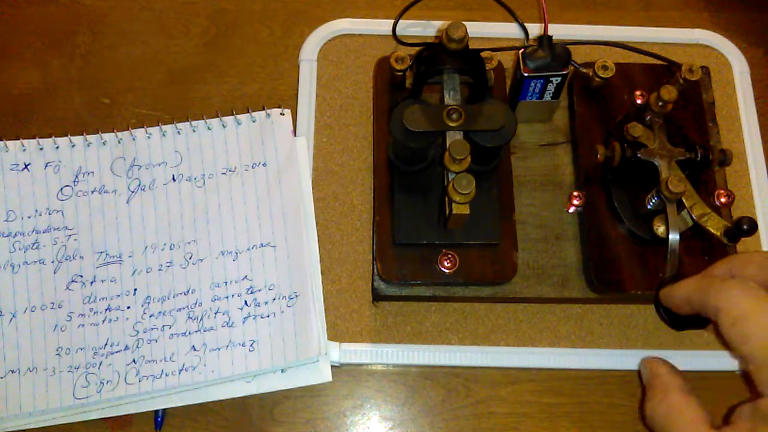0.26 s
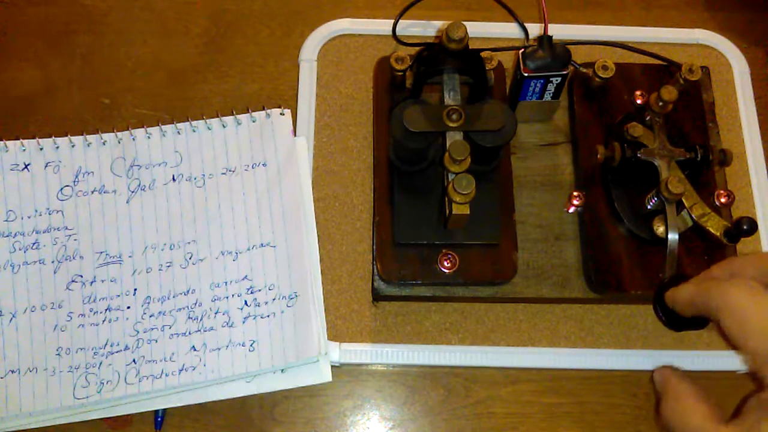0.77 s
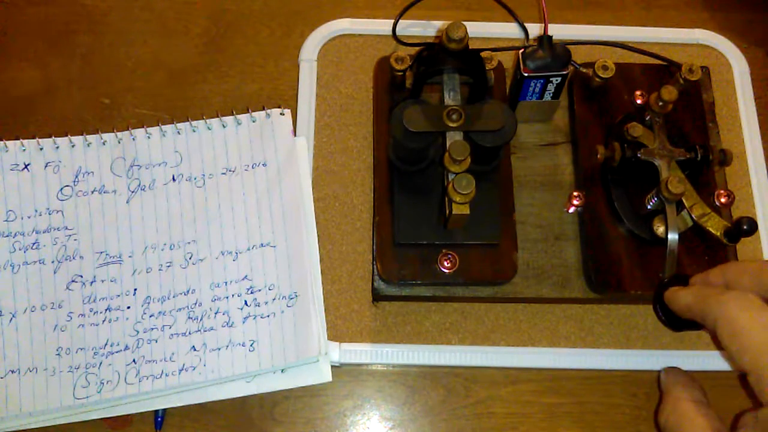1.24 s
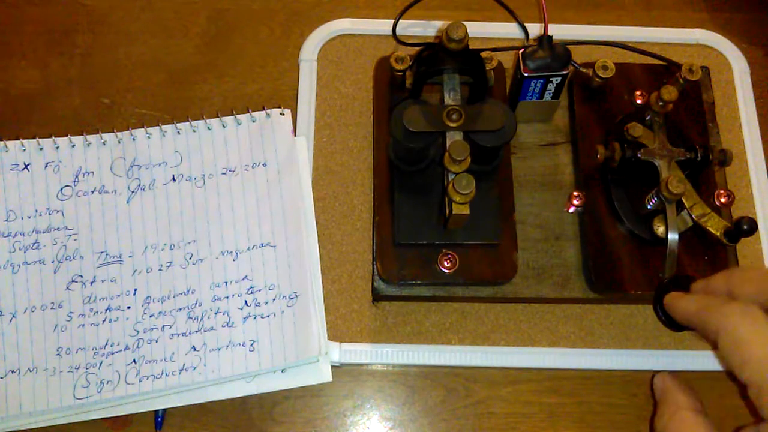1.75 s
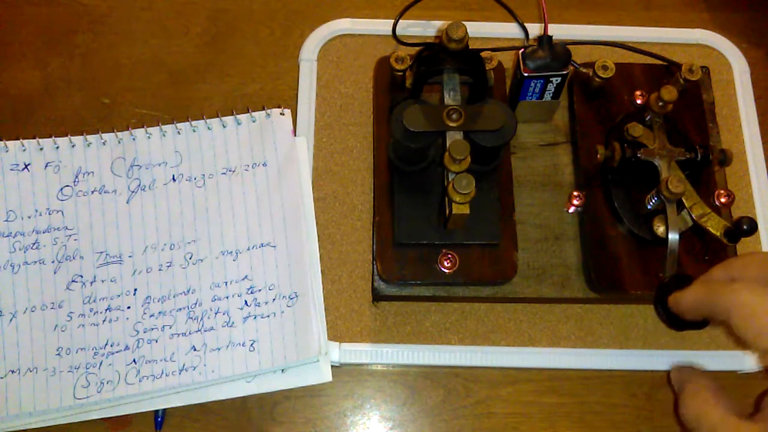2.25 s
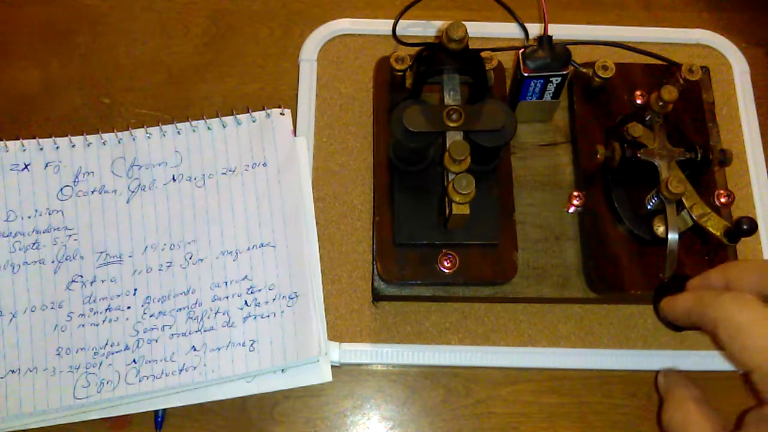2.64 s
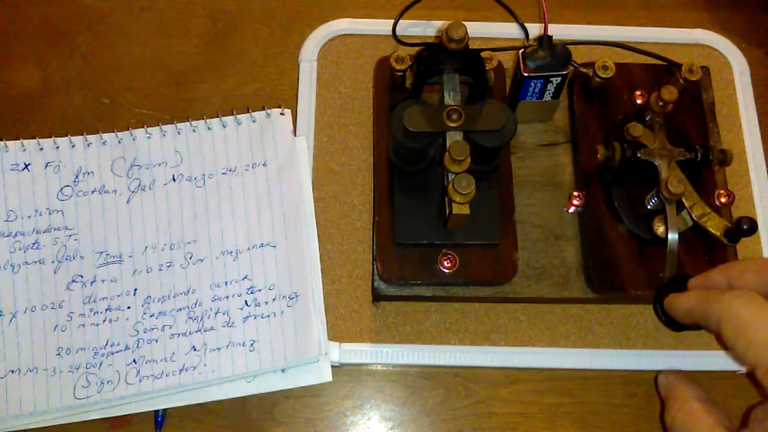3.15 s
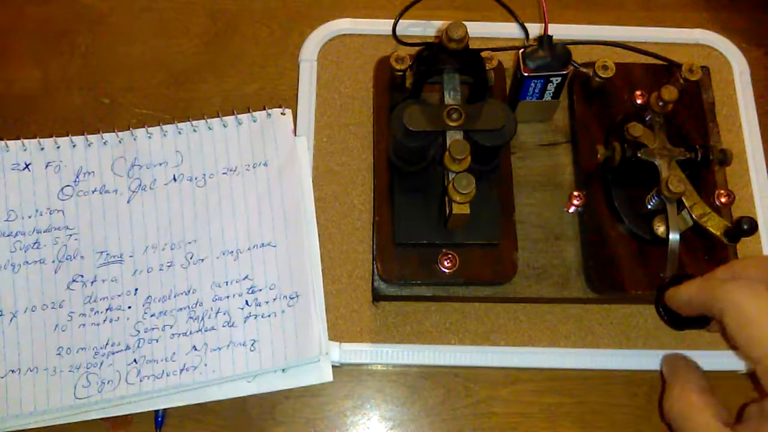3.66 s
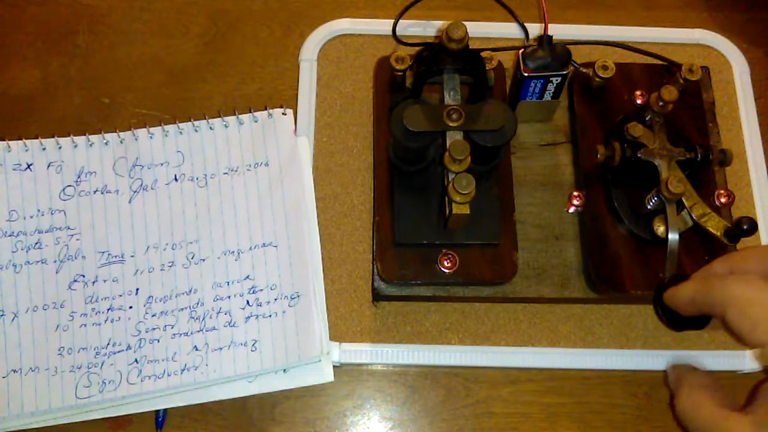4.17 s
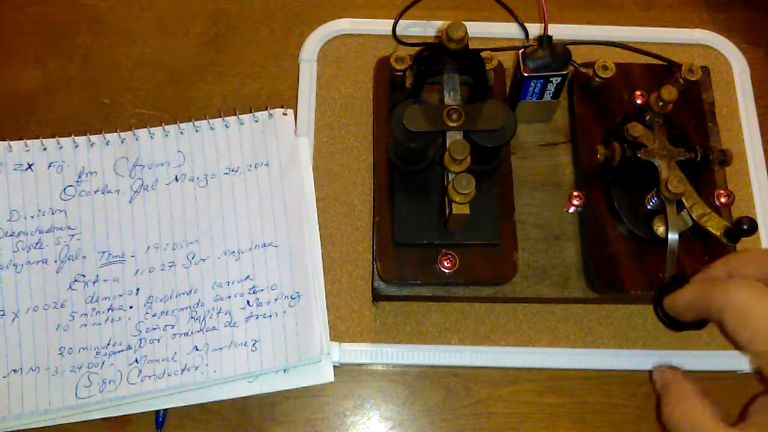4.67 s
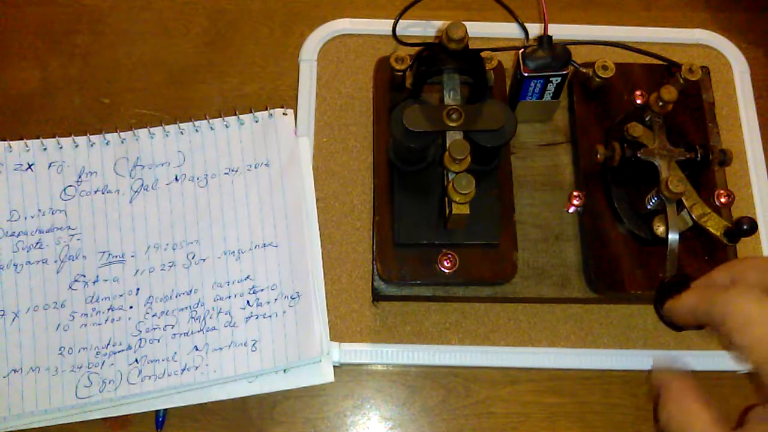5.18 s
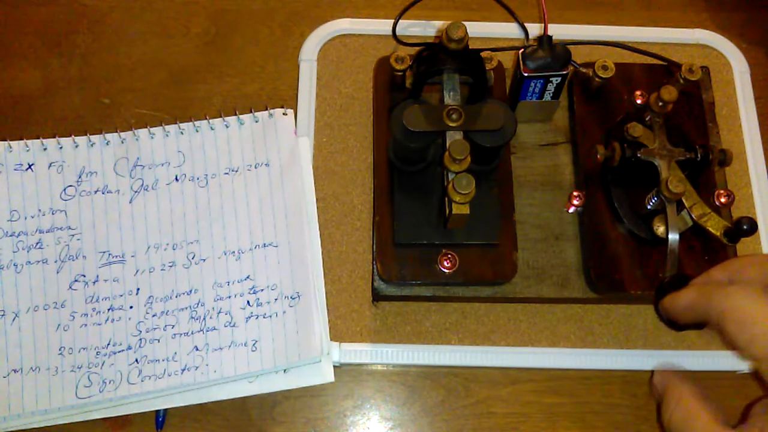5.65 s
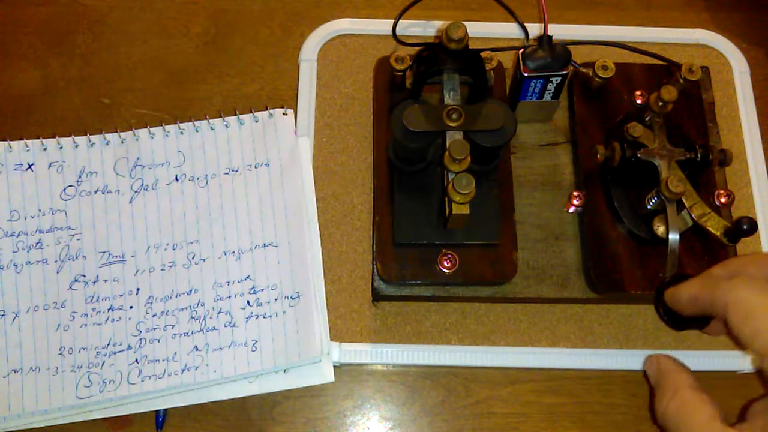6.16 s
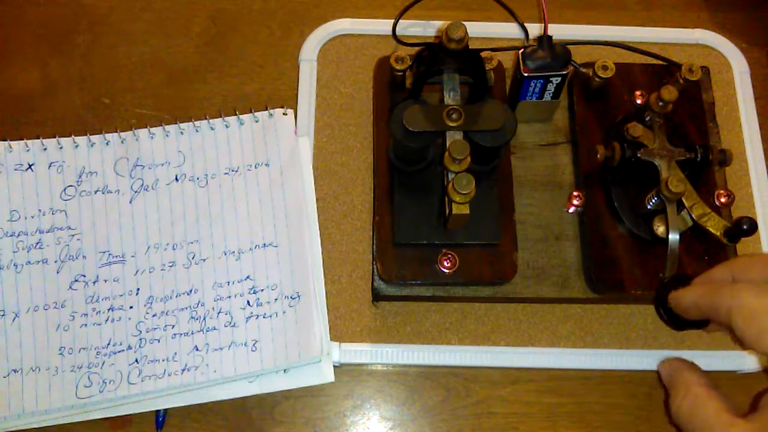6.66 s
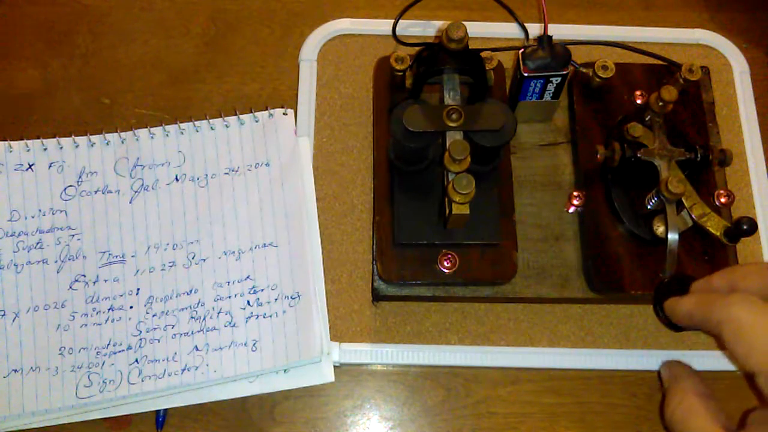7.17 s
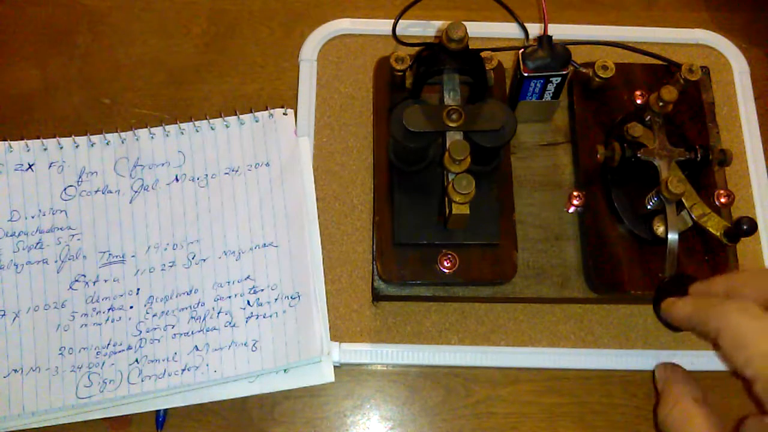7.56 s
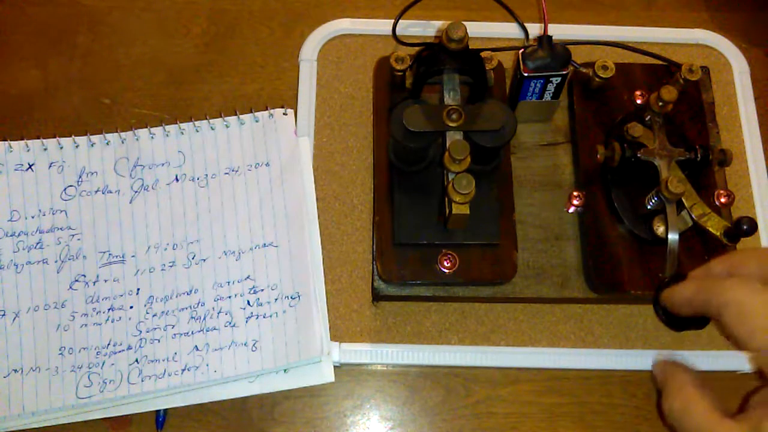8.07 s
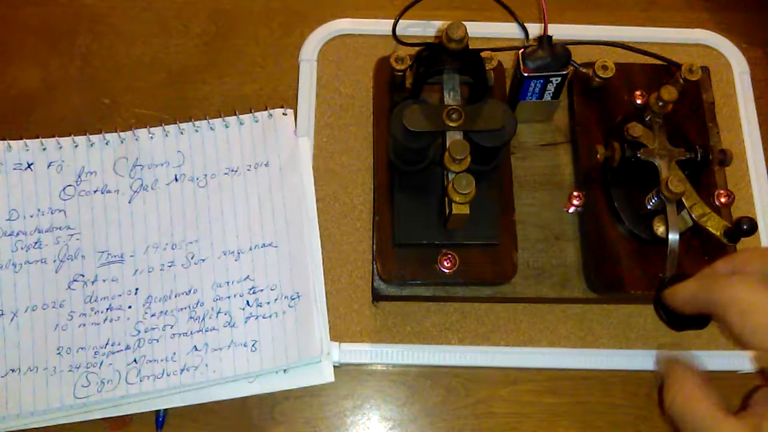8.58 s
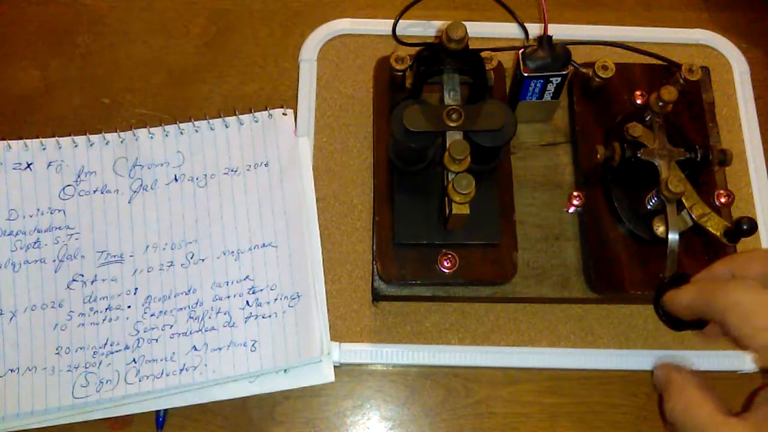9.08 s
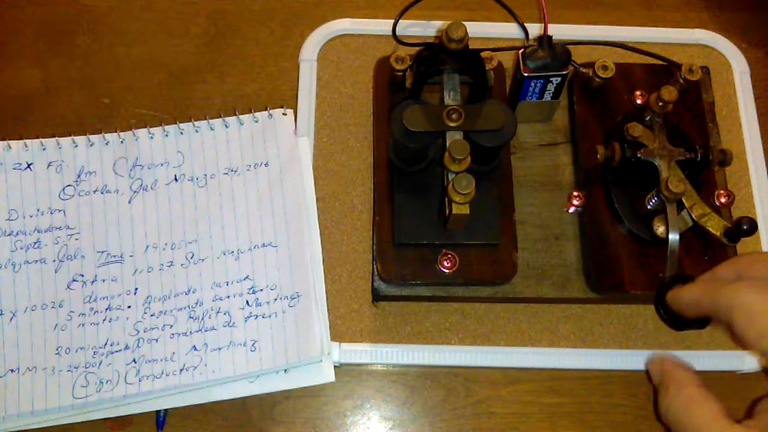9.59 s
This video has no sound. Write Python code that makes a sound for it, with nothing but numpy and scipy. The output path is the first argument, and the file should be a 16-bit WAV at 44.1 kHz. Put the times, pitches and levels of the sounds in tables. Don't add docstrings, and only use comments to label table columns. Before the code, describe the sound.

Close stereo microphone at a table top in a quiet room: a telegraph key is tapped quickly by hand, its sounder bar answering each press with a hard down-clack and an up-clack, plus softer lever ticks. Short and longer gaps form an uneven code rhythm that continues to the end. Each click is dry, bright and choked, with a slight near echo and short room tail over faint hum and hiss.

```python
import sys
import numpy as np
from scipy import signal
from scipy.io import wavfile
from scipy.ndimage import uniform_filter1d

SR = 44100
rng = np.random.default_rng(int(sys.argv[2]) if len(sys.argv) > 2 else 0)


def master_out(mix):
    frames = np.transpose(np.atleast_2d(mix))
    ceiling = np.clip(frames, -1, 1)
    pcm = np.round(ceiling * 32767).astype(np.int16)
    wavfile.write(sys.argv[1], SR, pcm)


def magnitude_from_level(level_db):
    exponent = np.asarray(level_db, float) / 20
    return 10 ** exponent


N = 433503

# bar_drop_s, bar_rise_s, key_force_db, lever_travel_ms, contact_to_anvil_ms
FIRST_PRESSES = [(0.3613, 0.3978, -22.5, 12.4, 13.8), (0.4899, 0.5229, -25.0, 18.9, 14.0),
                 (0.6172, 0.7535, -27.5, 32.4, 13.9), (0.8207, 0.8636, -21.5, 11.6, 14.9),
                 (0.9433, 0.9833, -20.5, 15.7, 14.4), (1.2031, 1.5456, -28.5, 24.6, 13.7),
                 (1.756, 1.857, -25.5, 15.9, 14.5), (1.9352, 2.0234, -24.0, 22.3, 15.1),
                 (2.1595, 2.1942, -24.0, 12.6, 14.7), (2.2701, 2.311, -23.0, 16.7, 14.7),
                 (2.4867, 2.5713, -27.0, 19.1, 13.8), (2.6475, 2.6836, -22.5, 16.4, 15.0),
                 (2.8391, 2.8674, -24.5, 14.5, 15.2), (2.9666, 3.0025, -27.5, 19.0, 15.4),
                 (3.1144, 3.2402, -28.0, 27.1, 15.0), (3.3794, 3.5047, -26.0, 28.6, 15.8),
                 (3.6297, 3.6542, -25.5, 14.1, 16.4), (3.7788, 3.8157, -23.0, 14.8, 16.0),
                 (3.9848, 4.0125, -26.0, 13.8, 15.4), (4.0834, 4.1212, -23.0, 13.4, 14.9),
                 (4.2087, 4.2498, -21.0, 26.7, 15.0)]
LATER_PRESSES = [(4.5259, 4.5737, -22.5, 15.0, 14.0), (4.742, 4.7765, -23.0, 14.0, 15.8),
                 (4.8645, 4.911, -22.0, 12.9, 14.6), (5.0092, 5.0489, -20.0, 19.0, 14.5),
                 (5.2618, 5.287, -24.5, 13.1, 14.7), (5.3876, 5.423, -23.0, 33.0, 14.8),
                 (5.5573, 5.5903, -24.0, 25.0, 14.8), (5.7119, 5.745, -24.0, 16.5, 15.0),
                 (5.861, 5.888, -26.0, 18.9, 15.5), (6.0801, 6.1078, -22.0, 13.0, 15.0),
                 (6.3188, 6.3478, -23.0, 15.3, 15.1), (6.5208, 6.551, -23.5, 11.0, 15.3),
                 (6.6399, 6.6733, -22.5, 16.2, 15.1), (6.8371, 6.8678, -23.5, 14.0, 14.4),
                 (6.9769, 7.0867, -26.5, 21.6, 14.6), (7.2169, 7.3145, -28.5, 18.9, 15.2),
                 (7.3859, 7.4181, -22.5, 12.7, 15.7), (7.5929, 7.6996, -23.5, 18.0, 14.7),
                 (7.78, 7.8156, -21.0, 13.3, 15.9), (7.9087, 7.9442, -23.0, 16.8, 15.1),
                 (8.1161, 8.1483, -20.5, 10.0, 14.9), (8.2845, 8.3162, -23.5, 15.2, 15.5),
                 (8.5326, 8.5702, -17.0, 16.0, 14.3), (8.6759, 8.717, -21.0, 25.0, 15.3),
                 (8.8466, 8.8896, -22.0, 12.8, 15.2), (9.0136, 9.0512, -22.5, 13.0, 15.6),
                 (9.164, 9.1924, -23.5, 13.0, 15.8), (9.3771, 9.4055, -20.0, 16.5, 14.8),
                 (9.5656, 9.5978, -21.0, 14.8, 14.2), (9.7651, 9.7963, -21.0, 17.0, 14.1)]
# lead_s, level_re_rise_db
UNSTICK = (.0052, -25)
# time_s, level_db
EARLIER_RISE = (-0.055, -14)

# mode_hz, t60_s, left_swing, right_swing
KEY_MODES = [(360, 0.0036, 0.3, 0.4), (520, 0.03, -0.16, -0.24), (900, 0.009, 2.2, 1.5),
             (1215, 0.0211, -0.95, -0.7), (1820, 0.0098, 0.14, -0.53), (2180, 0.0066, -3.09, -0.49),
             (2450, 0.04, 4.31, 1.68), (2780, 0.0133, 0.91, 0.56), (3260, 0.0044, 2.19, 1.58),
             (3670, 0.005, -0.85, 1.13), (4320, 0.0102, -0.85, 1.19), (5020, 0.003, -0.54, 0.93),
             (5470, 0.0104, 0.03, 0.46), (5990, 0.0095, -1.87, -0.31), (6480, 0.0079, 1.33, 0.21),
             (6790, 0.0043, 1.37, -0.02), (7380, 0.0263, 1.85, 0.44), (8220, 0.0042, 0.59, 0.15),
             (8920, 0.0052, 1.65, 0.01), (9900, 0.0077, 0.47, 0.12), (10490, 0.0116, -1.12, 0.06),
             (10730, 0.0166, 1.26, -0.08), (11340, 0.0092, -0.67, 0.0), (12310, 0.0398, 0.93, 0.02),
             (13350, 0.0087, -0.08, -0.01), (13850, 0.0061, -0.34, -0.03), (15560, 0.0228, -0.21, -0.03)]
ANVIL_MODES = [(350, 0.0116, -0.23, -0.28), (700, 0.0069, 1.5, 2.11), (940, 0.0056, 0.2, 0.4),
               (1275, 0.022, 0.5, 1.0), (1750, 0.0218, 0.82, 1.64), (2110, 0.006, 4.6, -3.6),
               (2390, 0.0081, -5.18, -1.78), (3080, 0.024, 1.08, 1.96), (3180, 0.003, 6.47, 5.86),
               (4240, 0.0066, 0.76, 3.45), (4500, 0.007, 3.06, -3.92), (4850, 0.0246, 0.1, -1.21),
               (4990, 0.018, 2.4, 3.3), (5170, 0.016, 1.9, -1.7), (5790, 0.0138, -0.31, -1.25),
               (6030, 0.0073, -1.64, -0.82), (6570, 0.0078, -0.53, -1.09), (7190, 0.0031, -3.63, -4.37),
               (7620, 0.0144, -0.52, -0.68), (8730, 0.01, 0.4, 0.6), (9040, 0.003, 5.69, -0.18),
               (9520, 0.0112, 3.29, -0.57), (10330, 0.0095, 2.62, -1.24), (10770, 0.0038, 5.37, -2.85),
               (11520, 0.0086, -2.01, -0.45), (11830, 0.0081, 6.31, -1.4), (12000, 0.012, 3.75, 0.68),
               (12910, 0.0095, -4.93, 0.54), (13320, 0.0046, -2.56, -0.68), (13850, 0.0064, -1.11, -0.64),
               (14800, 0.0116, 0.1, -0.06)]
STOP_MODES = [(370, 0.04, -0.34, -0.34), (630, 0.003, -1.04, -1.17), (930, 0.0265, 0.43, 0.32),
              (1230, 0.04, 0.56, 0.66), (1720, 0.03, -1.1, -2.2), (2070, 0.03, 2.5, 1.6),
              (2250, 0.018, -1.9, -0.5), (2430, 0.025, 1.3, 0.55), (2970, 0.022, -3.0, -1.9),
              (3200, 0.02, 1.1, 0.9), (3420, 0.02, -0.6, -0.2), (3950, 0.0195, -0.57, -0.98),
              (4580, 0.017, -1.2, 1.4), (4780, 0.03, 1.3, 1.13), (5220, 0.0102, -2.46, 1.44),
              (5740, 0.04, -0.41, -0.27), (6180, 0.0055, 3.06, 1.57), (6830, 0.0118, 0.38, -2.89),
              (7090, 0.025, -0.91, 1.23), (7650, 0.0139, 1.91, 1.25), (7850, 0.0242, 0.75, -0.15),
              (8870, 0.007, -7.75, 2.55), (9430, 0.04, 0.24, -0.18), (9950, 0.0083, 2.81, 0.03),
              (10240, 0.0136, -4.24, 1.35), (11290, 0.006, 3.49, 0.43), (11780, 0.0219, -0.45, 0.09),
              (12410, 0.0055, 8.22, 1.28), (13240, 0.0098, 1.71, 0.44), (14300, 0.0041, 4.78, 0.85),
              (15180, 0.04, -0.11, -0.02)]
SCREW_MODES = [(1220, 0.013, 0.53, 0.69), (2220, 0.016, -0.56, -0.82), (2510, 0.018, -1.24, 0.2),
               (3340, 0.048, 0.17, -0.24), (3180, 0.013, -0.21, 0.67), (4630, 0.0073, 0.33, .35),
               (10500, 0.0079, 0.63, -0.19), (11560, 0.0057, .25, .05)]
# mode_hz, t60_s, left_swing, right_swing
BOARD_MODES = [(2300, .012, .7, 1.9), (3000, .008, .3, .6), (5950, .007, .1, 2.4), (6400, .007, -.1, -1.9),
               (7400, .004, .05, 1.1), (8300, .004, .05, -.8), (11200, .003, 0.02, .5)]
# ring_hz, t60_s, left_swing, right_swing
BAR_RINGS = [(594, 0.18, 0.025, 0.05), (873.5, 0.071, 0.19, 0.015), (2280, 0.28, 0.047, 0.035),
             (2390, 0.19, .01, 0.028), (3230, 0.2, 0.028, 0.047), (4480, .1, .005, .03),
             (4670, .14, .01, 0.039), (4780, 0.28, 0.02, 0.036), (5500, 0.1, 0.0089, 0.025),
             (8220, 0.11, 0.014, 0.028), (10300, 0.077, 0.072, 0.08), (10380, 0.09, .06, .05),
             (1273, 0.13, 0.062, 0.053)]

# rise_left_ms, rise_right_ms, rebound_delay_ms, rebound_share, arrival_left_ms, arrival_right_ms
KEY_BLOW = (.627, .41, .614, .93, -.096, -.014)
ANVIL_BLOW = (1.483, 3, .887, .589, -.104, .029)
STOP_BLOW = (3, 3, .568, -.457, -.089, .044)
SCREW_BLOW = (.6, .7, .9, .4, -.09, .04)
BOARD_BLOW = (.5, .5, .6, .3, 0, 0)
# choke_ms, crack_db, crack_length_ms (held within 0.5 to 2), long_ring_db, room_db, echo_db
KEY_REST = (7, -3, 30, -25, -14, -8)
ANVIL_REST = (10.5, 0.5, 21.5, -9.5, -7.5, -6.5)
STOP_REST = (8.5, 4, 11.5, 1.5, -9, 0)
SCREW_REST = (8.5, -18, 4.5, -27.5, -22.5, -29.5)
BOARD_REST = (2.1, -14, 1.2, -40, -25, -30)
# mode_hz, extra_path_to_right_ms
ANVIL_DETOUR = [(1250, -.07), (1750, 0), (2130, -.04), (2400, 0), (4500, 0), (5000, -.02)]
STOP_DETOUR = [(1230, -.05), (1750, .05), (2090, .105), (2250, .09), (2430, .035), (2940, -.02),
               (4800, -.055), (5700, 0)]

# band_hz, left_db, right_db
CRACK_COLOUR = [(150, -40, -39), (406, 6, -2), (1480, -8, 8), (4140, 5, 9.5), (8300, 4.5, 3),
                (12400, 10.5, -8), (14050, -8, -16), (15500, -13, -36.5)]
# delay_s, left_db, right_db
ECHOES = [(.0066, -12, -3.5), (.0088, -11, -20), (0.0175, -14, -19.5), (.022, -27, -18)]
# band_hz, left_db, right_db
WALL_COLOUR = [(200, -31, -51), (940, 0.5, -4), (2060, -15, -6.5), (2730, -8, 6), (3070, -21, -25.5),
               (3400, -15, 1.5), (4700, -13, -5.5), (6270, -32, -10), (8300, -40, -1.5),
               (11800, -20.5, -14), (15100, -4.5, -18.5)]
# band_hz, left_db, right_db
TAIL_COLOUR = [(90, -27, -38.5), (298, -6, 0.5), (600, 5.5, 3.5), (1270, -9.5, -3), (1620, -13.5, 2),
               (2320, -8.5, -3.5), (2500, -11.5, -3), (2700, -1, 4.5), (2980, -8.5, -4.5), (3280, -14, 5.5),
               (3600, -5, 1), (4450, -7, 6), (4760, -10.5, 4.5), (5600, -6, 3.5), (7840, -6, 1),
               (8200, 3, 5), (8700, -11, -11), (9600, -3, -9.5), (10300, -4, -3.5), (10800, -5.5, -9.5),
               (11200, -10, -12.5), (14500, -12, -11)]
# band_hz, t60_s
ROOM_DECAY = [(250, 0.77), (700, 0.16), (1800, 0.4), (4600, 0.31), (8000, 0.25), (12000, 0.23),
              (16000, 0.35)]

# band_hz, density_db_per_hz
HUM_SPECTRUM = [(12, -31), (20, -26), (66, -13.5), (109, -10), (180, 4.5), (266, -7.5), (330, -21.5),
                (600, -32.5), (1100, -32), (2000, -46.5), (3500, -55), (7000, -59.5), (13000, -60.5),
                (14500, -62), (16500, -66)]
# band_hz, correlation
HUM_LIKENESS = [(60, 0.96), (130, 0.96), (290, 0.93), (640, 0.3), (1410, -0.04), (3100, 0.07), (6820, 0.04),
                (15000, 0.04)]
# band_hz, left_minus_right_db
HUM_BALANCE = [(60, 0.0), (130, 0.0), (290, 0.0), (640, -1.0), (1410, -6.5), (3100, -7.0), (6820, -8.5),
               (15000, -4.0)]
# time_s, lasting_s, drone_hz, width_hz, level_re_traffic_db
PASSES = [
    (.75, 0.14, 95.7, 11.4, 22),
    (1.1, 0.76, 64, 26, 9.5),
    (1.9, 0.76, 182.5, 10, 4.5),
    (3.75, 0.23, 262, 7.8, 10),
    (5.2, 0.17, 90, 12, 11.5),
    (6.8, 0.28, 181, 21, 6.5),
    (7.1, 0.75, 129, 8.8, 13),
    (7.3, 1, 42, 13.6, 8),
    (8.4, 0.47, 86, 13, 10),
    (9.0, 0.44, 158, 98, 6),
]


def strokes():
    presses = list(FIRST_PRESSES) + list(LATER_PRESSES)
    drop_s, rise_s, force_db, travel_ms, pull_ms = np.transpose(presses)
    drop_db, dash_loss_db, dash_s = -16.5, 0.86, 0.06
    rise_db = -18.5
    tap_db, quick_ms, loss_db_per_ms = -18, 7.9, 0.74
    shuts = zip(drop_s - pull_ms / 1000, force_db)
    falls = zip(drop_s, drop_db - dash_loss_db * (rise_s - drop_s > dash_s))
    rises = zip(rise_s, rise_db + 0 * rise_s)
    taps = zip(rise_s + travel_ms / 1000, tap_db - loss_db_per_ms * (travel_ms - quick_ms))
    return list(shuts), list(falls), list(rises), list(taps)


def key_contact(shuts):
    board_delay_s = 0.0066
    direct = knocks(shuts, KEY_MODES, KEY_BLOW, KEY_REST)
    returned = [(s + board_delay_s, db) for s, db in shuts]
    return direct + knocks(returned, BOARD_MODES, BOARD_BLOW, BOARD_REST)


def anvil_drop(falls):
    return knocks(falls, ANVIL_MODES, ANVIL_BLOW, ANVIL_REST, ANVIL_DETOUR)


def back_stop(rises):
    return knocks([EARLIER_RISE] + rises, STOP_MODES, STOP_BLOW, STOP_REST, STOP_DETOUR)


def light_taps(taps, rises):
    lead_s, level_db = UNSTICK
    lifts = [(s - lead_s, db + level_db) for s, db in rises]
    return knocks(taps + lifts, SCREW_MODES, SCREW_BLOW, SCREW_REST)


def knocks(events, modes, blow, rest, detour=((0, 0),)):
    rise_ms, (rebound_ms, rebound_share), arrival_ms = np.reshape(blow, (3, 2, 1))
    choke_ms, crack_db, crack_ms, bar_db, room_db, echo_db = rest
    pad, lead, ms = 4096, 32, 1e-3
    t = np.arange(-lead, 800) / SR - arrival_ms * ms
    late = t - rebound_ms * ms
    mode_db = 0.86 * rng.standard_normal((len(events), len(modes), 1))
    grit = rng.standard_normal((len(events), *t.shape))

    swell = 1 - np.exp(-np.maximum(t, 0) / (rise_ms * ms))
    late_swell = 1 - np.exp(-np.maximum(late, 0) / (rise_ms * ms))
    choke = np.exp(-(t / (choke_ms * ms)) ** 4)
    crack_decay = np.exp(-np.maximum(t, 0) / (np.clip(crack_ms, .5, 2) * ms))
    crack = magnitude_from_level(crack_db) * swell * crack_decay

    size = N + 2 * pad
    body, cracks, blows = np.zeros((2, size)), np.zeros((2, size)), np.zeros(size)
    for (s, db), vary_db, noise in zip(events, mode_db, grit):
        at = round(s * SR) + pad - lead
        span = slice(at, at + t.shape[1])
        modal = swell * ring(modes, t, vary_db, detour)
        modal += rebound_share * late_swell * ring(modes, late, vary_db, detour)
        body[:, span] += magnitude_from_level(db) * choke * modal
        cracks[:, span] += magnitude_from_level(db) * crack * noise
        blows[at + lead] = magnitude_from_level(db + bar_db)
    cracks = coloured(cracks, CRACK_COLOUR)
    out = body + cracks + through(blows[None], bar_ring())
    return in_room(out, cracks, room_db, echo_db)[:, pad:pad + N]


def ring(modes, t, vary_db=0, detour=((0, 0),)):
    hz, t60_s, *swing = np.transpose(modes)[:, :, None]
    path_s = np.array([0 * hz, read(detour, hz) / 1000])
    t = np.maximum(t[:, None] - path_s, 0)
    waves = magnitude_from_level(vary_db - 60 * t / t60_s) * np.sin(2 * np.pi * hz * t)
    return (np.array(swing) * waves).sum(1)


def bar_ring():
    t = np.arange(SR // 4) / SR
    return ring(BAR_RINGS, np.array([t, t])) * (1 - np.exp(-t / 0.0022))


def in_room(out, cracks, room_db, echo_db):
    scatter, scatter_hz, diffuse_db = 0.6, 300, 1
    radiated = out[0] + 0.018 * out[1] + cracks[1]
    tail, echoes = reflections(room_db, echo_db)
    flutter = rng.standard_normal(out.shape[1])
    flutter = signal.lfilter(*signal.butter(2, scatter_hz, fs=SR), flutter)
    flutter /= flutter.std()
    smeared = out[0] * (np.sqrt(1 - scatter ** 2) + scatter * flutter)
    smeared += magnitude_from_level(diffuse_db) * cracks[1]
    return out + through(radiated[None], echoes) + through(smeared[None], tail)


def reflections(room_db, echo_db):
    size, early_gain, early_s = SR // 3, 1.7, 0.013
    taps = np.zeros((2, size))
    grid = np.arange(330, size - 22, 22)
    at = grid + rng.integers(0, 22, (2, len(grid)))
    np.put_along_axis(taps, at, rng.choice([-1., 1.], at.shape), 1)
    hz, t, z = signal.stft(taps, SR, nperseg=256)
    same = 1 / (1 + (hz[:, None] / 900) ** 2)
    z[1] = same * z[0] + np.sqrt(1 - same ** 2) * z[1]
    z *= magnitude_from_level(-60 * t / read(ROOM_DECAY, hz)[:, None])
    tail = signal.istft(z, SR, nperseg=256)[1][:, :size]
    tail *= 1 + early_gain * np.exp(-np.arange(size) / SR / early_s)
    tail *= magnitude_from_level(room_db) / np.linalg.norm(tail, axis=1)[:, None]
    echoes = np.zeros_like(tail)
    for delay_s, *db in ECHOES:
        echoes[:, round(delay_s * SR)] = magnitude_from_level(np.add(db, echo_db))
    return coloured(tail, TAIL_COLOUR), coloured(echoes, WALL_COLOUR)


def through(x, response):
    return signal.fftconvolve(x, response, axes=1)[:, :x.shape[1]]


def coloured(x, table):
    hz = np.linspace(0, SR / 2, 257)
    colour = [signal.firwin2(257, hz, magnitude_from_level(read(table, hz, port)), fs=SR) for port in (1, 2)]
    return signal.oaconvolve(x, colour, axes=1)[:, 128:128 + x.shape[1]]


def read(points, hz, column=1):
    table = np.transpose(points)
    return np.interp(np.log(hz + 1), np.log(table[0] + 1), table[column])


def room_tone():
    hop = 512
    frames, hz = N // hop + 5, np.fft.rfftfreq(2048, 1 / SR)
    a, b, c, d, patches = rng.standard_normal((frames, len(hz), 5), dtype=np.float32).T
    patches = uniform_filter1d(uniform_filter1d(patches, size=3, axis=0), size=12, axis=1)
    same = np.clip(read(HUM_LIKENESS, hz), -1, 1)[:, None]
    left = a + 1j * b
    z = np.array([left, same * left + np.sqrt(1 - same ** 2) * (c + 1j * d)])
    deep = 1 / (1 + (hz / 110) ** 6)[:, None]
    bass = 1 / (1 + (hz / 330) ** 4)[:, None]
    lean_db = np.array([.5, -.5])[:, None, None] * read(HUM_BALANCE, hz)[:, None]
    level_db = read(HUM_SPECTRUM, hz)[:, None] + traffic_db(hz, np.arange(frames) * hop / SR, deep, bass)
    z *= magnitude_from_level(level_db + lean_db + 1.46 * bass * patches / patches.std())
    return 0.55 * signal.istft(z, nperseg=2048, noverlap=2048 - hop)[1][:, :N]


def traffic_db(hz, t, deep, bass):
    power_per_hz = magnitude_from_level(2 * read(HUM_SPECTRUM, hz))

    def gain_db(band_db, low_hz, high_hz):
        return band_db - 10 * np.log10(power_per_hz[(hz > low_hz) & (hz < high_hz)].sum())

    field_db = deep * gain_db(-50, 25, 110)
    field_db = field_db + (bass - deep) * gain_db(-48.5, 110, 280)
    field_db = field_db + (1 - bass) * gain_db(-44, 300, 16000)
    for s, lasting_s, drone_hz, width_hz, db in PASSES:
        near = (hz[:, None] - drone_hz) / width_hz
        field_db = field_db + db * np.exp(-near ** 2 - ((t - s) / lasting_s) ** 2)
    return field_db


def scene():
    shuts, falls, rises, taps = strokes()
    mix = key_contact(shuts)
    mix += anvil_drop(falls)
    mix += back_stop(rises)
    mix += light_taps(taps, rises)
    return mix + room_tone()


def low_pass(x):
    return signal.sosfilt(signal.butter(12, 16820, fs=SR, output="sos"), x)


def record(dry):
    band = signal.sosfilt(signal.butter(10, 15900, fs=SR, output="sos"), dry)
    band = signal.sosfilt(signal.cheby2(16, 40, 17000, fs=SR, output="sos"), band)
    return low_pass(np.clip(band + 0.0007, -1, 1))


dry = scene()
out = record(dry)
master_out(out)
```